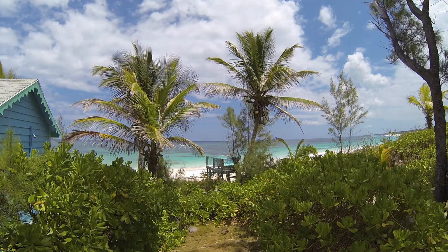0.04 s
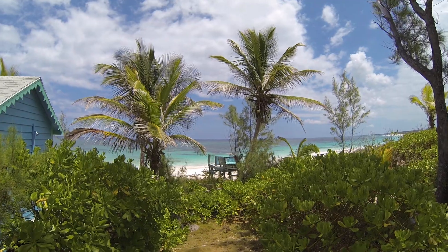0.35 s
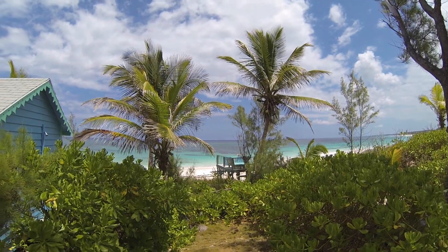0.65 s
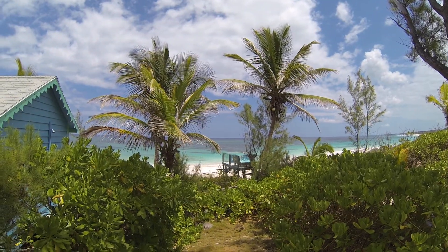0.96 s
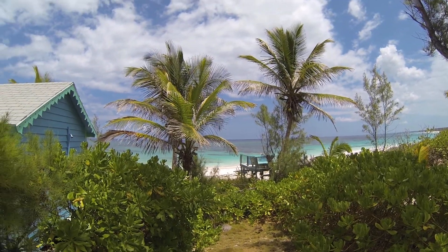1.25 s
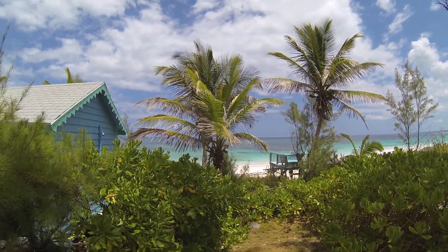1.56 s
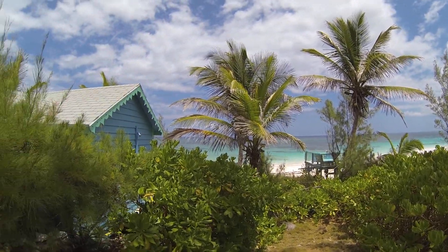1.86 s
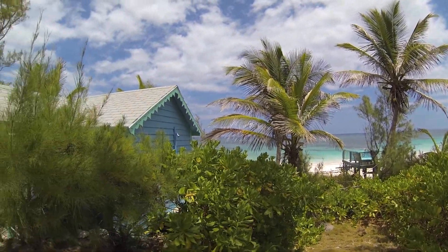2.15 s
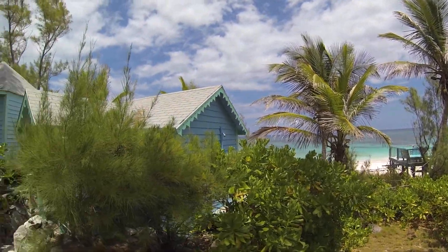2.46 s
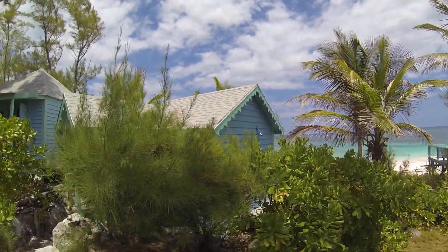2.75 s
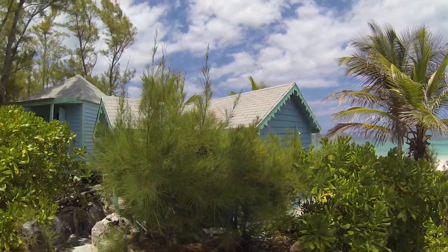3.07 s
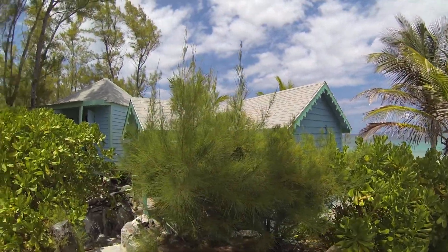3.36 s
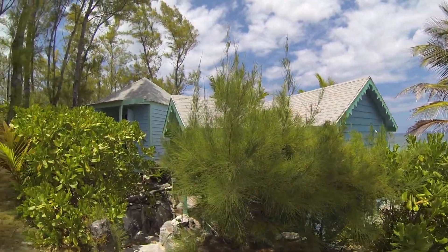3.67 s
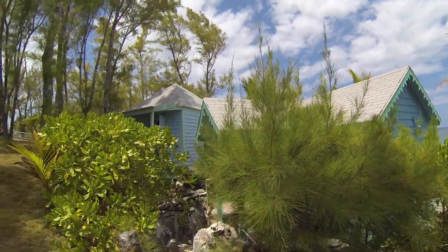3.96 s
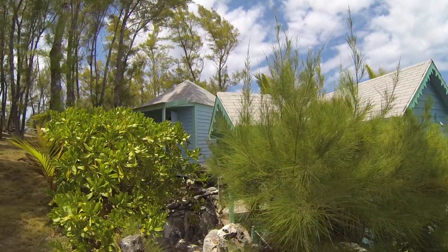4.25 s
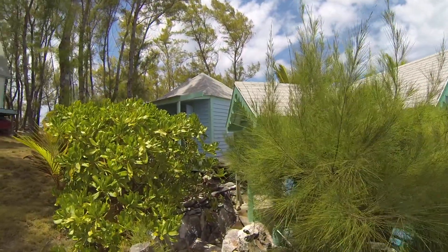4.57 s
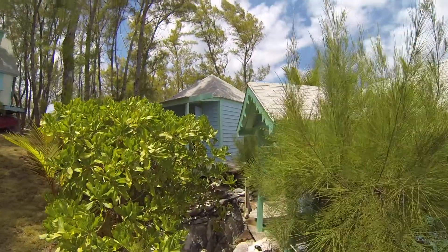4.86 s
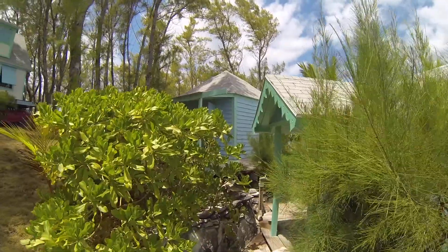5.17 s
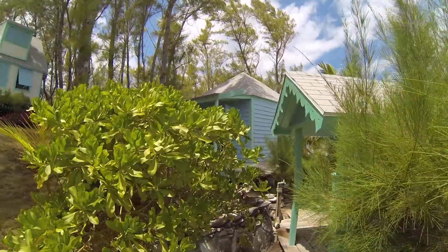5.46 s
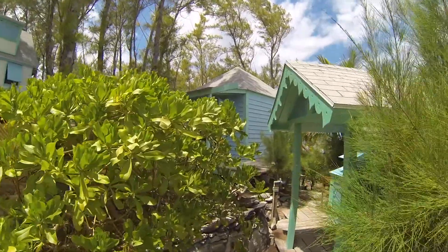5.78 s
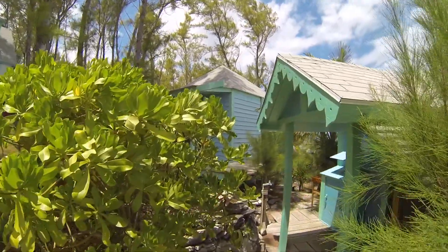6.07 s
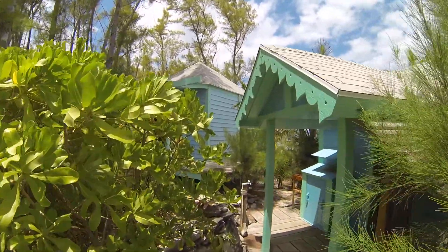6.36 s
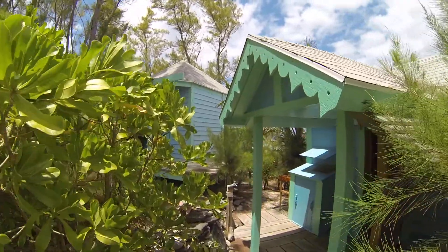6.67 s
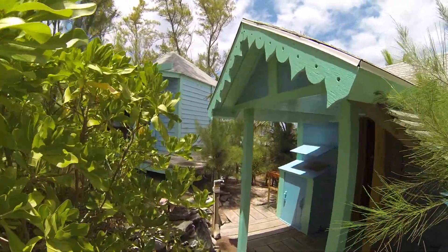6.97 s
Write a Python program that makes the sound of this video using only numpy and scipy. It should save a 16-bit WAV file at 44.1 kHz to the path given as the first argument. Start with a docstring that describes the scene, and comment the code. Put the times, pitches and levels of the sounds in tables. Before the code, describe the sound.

Close, high cicada buzzing outdoors with a soft wash of far waves and leaves, interrupted by low wind buffeting the microphone.

```python
"""A garden behind a beach; one microphone, turning from the sea towards the trees.
From the start a cicada buzzes close by, snapping the ribs of its tymbal, with a far chorus behind it.
Distant surf slowly gives way to wind in the foliage, while a breeze rumbles on the microphone.
Midway, gusts buffet the diaphragm and the limiter ducks. Then the breeze drops, leaves brush,
a twig ticks, and the low murmur of the reef swells near the end."""
import sys
import numpy as np
from scipy import signal
from scipy.fft import rfft, irfft
from scipy.io import wavfile
from scipy.ndimage import uniform_filter1d, map_coordinates

SR = 44100
rng = np.random.default_rng(int(sys.argv[2]) if len(sys.argv) > 2 else 0)


def master_out(mix):
    """Clip the mix to full scale and print it as 16-bit PCM to the path in sys.argv[1]."""
    frames = np.transpose(np.atleast_2d(mix))
    ceiling = np.clip(frames, -1, 1)
    pcm = np.round(ceiling * 32767).astype(np.int16)
    wavfile.write(sys.argv[1], SR, pcm)


N = 313992
T = np.arange(N) / SR
HZ = np.fft.rfftfreq(N, 1 / SR)


def cicadas():
    """Close by, tymbal clicks ring one insect's body; far off, a chorus blurs into hiss."""
    # resonances of the body and of its overtone: (frequency [Hz], gain [dB])
    body_spectrum = [(2470, -47), (4200, -17), (4480, -3.5), (4790, -1.5), (5250, -3), (5520, -4),
                     (5850, -6), (6650, -2.7), (7250, -1), (8300, -6.5), (8900, -11.5), (9400, -20.5),
                     (12200, -46), (20700, -120)]
    overtone_spectrum = [(10500, -26), (11600, -3), (12300, 11), (13200, 8), (14300, 1), (15500, -27)]
    # the buzz ahead of its swells: (time [s], level [dB])
    buzz_levels = [(0.1, -47.5), (1.15, -48), (1.8, -47.5), (2.6, -45.5), (3.2, -46), (3.62, -44),
                   (3.98, -41.5), (4.3, -41.5), (4.7, -41.3), (5.1, -42), (5.85, -42.3), (6.5, -40.5),
                   (7.1, -42.4)]
    # the overtone flares up: (middle [s], half length [s], boost [dB])
    flares = [(.7, .2, 3.5), (1.75, 0.4, 7), (3.45, .1, 2.5), (4.1, .15, 4), (4.8, 0.4, 3.5),
              (5.531, 0.2, 5.5), (6.05, 0.15, 3)]
    body_clicks, overtone_clicks = tymbal(speed=0.99, waver=0.00421, jitter_ms=0.03)
    near = evened(scattered(body_clicks, t60=.07, wet_db=0))
    chorus = gain_of(-5) * noise()
    song = steadied(coloured(reflected(near + chorus), body_spectrum), 0.08)
    buzz_db = curves(buzz_levels)[0]
    buzz = gain_of(buzz_db) * swelling(song)
    # each snap leaves a brief fizz, so the strong ribs merge into one pulse a cycle
    snap_energy = signal.lfilter([1], [1, -np.exp(-1 / (.001 * SR))], overtone_clicks ** 2)
    fizz = evened(noise() * np.sqrt(abs(snap_energy)))
    snaps = evened(scattered(overtone_clicks, t60=0.027, wet_db=4))
    overtone = steadied(coloured(fizz + .5 * snaps, overtone_spectrum), .2)
    # the overtone lies under the buzz and follows its loudness
    usual_db, under_db, follow = -44.5, -15, 0.99
    flare_db = sum(db * np.exp(-((T - s) / half) ** 2) for s, half, db in flares)
    overtone_db = usual_db + under_db + follow * (buzz_db - usual_db) + flare_db
    return buzz + gain_of(overtone_db) * overtone


def tymbal(speed, waver, jitter_ms):
    """Ribs buckle one after another in each cycle: clicks for the body and for the overtone."""
    # the tymbal's pace, to be scaled by speed: (time [s], base rate [cycles/s])
    pace = [(0, 96), (1.2, 108), (2.2, 101), (3, 92.2), (4, 92.4), (5, 99.6), (7.1, 98)]
    # the ribs: (place in the cycle [0-1], body drive [dB], overtone drive [dB])
    ribs = [(0.112, -5.5, -9.5), (0.231, 1.5, 5), (0.399, -12, -13.5), (.50, 4.5, -1), (0.658, -30, 6),
            (.78, 4, 11), (0.967, -1, -22)]
    cycles = np.cumsum(speed * curves(pace)[0] * (1 + waver * drift(38.4))) / SR
    place, body_db, overtone_db = np.transpose(ribs)
    due = np.arange(int(cycles[-1]) + 1)[:, None] + place
    slip, force = rng.standard_normal((2,) + due.shape)
    seconds = (np.interp(due, cycles, T) + jitter_ms * slip / 1000).ravel()
    strength = gain_of(0.26 * force) * (due < cycles[-1])
    return [clicks(seconds, (strength * gain_of(db)).ravel()) for db in (body_db, overtone_db)]


def swelling(song):
    """Swaying branches make the buzz flutter in patches; bands of it swell, glide and sink back."""
    # (middle [s], half length [s], first pitch [Hz], last pitch [Hz], half width [Hz], boost [dB])
    swells = [(.6, 1.5, 7060, 7050, 750, 5), (.95, 1.8, 6930, 7120, 85, 4.5),
              (1.56, .43, 6850, 6750, 1020, 8.5), (2.02, 0.33, 6400, 6360, 1180, 9.5),
              (2.33, 0.66, 8460, 8000, 610, 6.5), (2.56, 0.42, 5770, 6200, 574.1, 10.5),
              (2.929, 0.39, 5360, 4860, 332, 10), (3.374, 0.32, 5640, 5600, 453.6, 9),
              (3.85, 0.33, 4960, 4920, 92.59, 10.5), (3.944, 0.27, 7400, 7600, 2052, 5),
              (4.35, 1.3, 7080, 7100, 148.1, 2), (5.448, 0.38, 6991, 8478, 1026, 5.5),
              (5.68, 0.46, 6270, 5750, 190, 5.5), (5.82, .27, 4900, 5000, 120.4, 0),
              (6.414, 0.33, 4600, 4620, 170, 2.5), (7.0, .35, 4798, 5200, 130, 6),
              (7.103, 0.18, 5800, 6750, 432, 7.5)]
    flutter_db, flutter_s, flutter_hz = 1.1, .15, 170
    hz, t, spectra = signal.stft(song, SR, nperseg=2048, noverlap=1536)
    patches = uniform_filter1d(rng.standard_normal(spectra.shape), int(flutter_hz / hz[1]), axis=0)
    db = flutter_db * evened(uniform_filter1d(patches, int(flutter_s / t[1]), axis=1))
    for middle, half, first_hz, last_hz, width_hz, boost_db in swells:
        progress = np.clip(.5 + .5 * (t - middle) / half, 0, 1)
        off_centre = (hz[:, None] - first_hz - (last_hz - first_hz) * progress) / width_hz
        db += boost_db * np.sin(np.pi * progress) * np.exp(-off_centre ** 2)
    return signal.istft(spectra * gain_of(db), SR, nperseg=2048, noverlap=1536)[1][:N]


def scattered(x, t60, wet_db):
    """Adds dense echoes off leaves and walls, which change as the microphone moves."""
    t = T[:SR // 4]
    tails = rng.standard_normal((2, len(t))) * 1e-3 ** (t / t60)
    first, second = (signal.fftconvolve(x, tail / np.linalg.norm(tail))[:N] for tail in tails)
    return x + gain_of(wet_db) * (np.cos(2 * T) * first + np.sin(2 * T) * second)


def reflected(x):
    """A close reflection, about 2 ms late, combs the buzz."""
    # (time [s], comb spacing [Hz], echo strength [0-1])
    reflection = [(0, 532, 0.2), (1.5, 569, 0), (2.4, 545.8, 0.3), (3.2, 550, 0.47), (3.8, 570, 0),
                  (4.6, 534, 0), (5.4, 545, 0.26), (6.4, 582, 0.17), (7.1, 554, 0)]
    comb_hz, strength = curves(reflection)
    return x + strength * map_coordinates(x, [np.arange(N) - SR / comb_hz], order=3)


def microphone_wind():
    """Air right on the microphone: a slow rumble, and in gusts small eddies striking the port."""
    # rumble of the light breeze: (time [s], level [dB])
    breeze = [(0, -33.5), (.9, -38), (2.5, -32.5), (3, -23.5), (4.3, -30.5), (5.15, -32), (5.4, -45.5),
              (7.1, -56)]
    # (start [s], length [s], rumble [dB], turbulence [dB])
    gusts = [(.19, 0.18, -30, -59), (1.097, .14, -32, -61), (1.38, .3, -24.5, -49.5),
             (2.217, .13, -23, -70), (2.605, 0.088, -19.5, -32.5), (2.712, 0.091, -17, -26.5),
             (2.839, 0.12, -17, -20), (2.98, 0.15, -22.5, -19.5), (3.106, 0.073, -12.5, -39),
             (3.339, 0.045, -20.5, -18), (3.401, 0.118, -20.5, -21), (3.513, 0.16, -16.5, -25.5),
             (3.731, 0.061, -18.5, -15), (3.811, 0.045, -12, -11.5), (3.896, .15, -23, -20.5),
             (4.071, 0.096, -21.5, -21.5), (4.214, 0.041, -16.5, -19), (4.3, 0.024, -24, -31.5),
             (4.597, 0.032, -25.5, -40), (4.734, 0.088, -23, -33.5), (5.107, 0.089, -25.5, -58)]
    # colours of the rumble and of the eddies: (frequency [Hz], gain [dB])
    rumble_spectrum = [(10, -25), (22, 8), (35, 0), (65, -4), (105, -18), (160, -31), (300, -45.5),
                       (600, -69)]
    eddy_spectrum = [(30, -15), (85, 9.5), (150, 1.5), (240, -3.5), (330, -10), (460, -18.5), (700, -34),
                     (1100, -53), (2500, -55), (6000, -81)]
    lulls_db = 2 * drift(7)
    flow, turbulence = gain_of(curves(breeze)[0] + lulls_db), np.zeros(N)
    for start, length, rumble_db, eddy_db in gusts:
        flow = np.maximum(flow, gain_of(rumble_db) * gust(start, length, release_s=0.029))
        turbulence = np.maximum(turbulence, gain_of(eddy_db) * gust(start, length, release_s=0.014))
    rumble = flow * steadied(coloured(noise(), rumble_spectrum), 0.11)
    eddies_per_s = 450
    strikes = noise() * (rng.random(N) < eddies_per_s / SR)
    lumps_db = 2.5 * (drift(22) + 0.06)
    eddies = steadied(coloured(strikes, eddy_spectrum), 0.036) * gain_of(lumps_db)
    fine = band(eddies, 368, 6000, order=4)
    growth = turbulence / gain_of(-22)  # harder gusts shed finer eddies
    return rumble + turbulence * (eddies - fine + growth * fine)


def gust(start, length, release_s, attack_s=0.021):
    """A gust's envelope: it rises quickly, holds and dies away."""
    rise = np.clip((T - start) / attack_s + .5, 0, 1)
    return rise * np.exp(-np.maximum(T - start - length, 0) / release_s)


def buffets():
    """A large eddy sucks at the diaphragm, which swings back; the rush of air rasps in the port."""
    # (time [s], peak [dB], half width [ms], rasp [dB])
    blows = [(0.215, -19, 4.9, -70), (2.703, -7, 4.9, -60), (2.769, 0.5, 1.9, -42), (2.844, -4.5, 3.5, -50),
             (2.902, -7, 1.34, -46), (2.941, 3.5, 2.6, -43), (3.365, -1.5, 1.86, -60), (3.575, 1, 4.7, -41),
             (3.634, -6.5, 4.5, -49), (3.776, -10, 1.1, -60), (3.836, 0.5, 1.5, -60),
             (4.092, -4, 2.14, -60), (4.164, 0, 3.2, -40), (4.621, -10, 4.6, -70), (4.834, -16, 2.5, -70)]
    out = np.zeros(N)
    rasp = evened(band(noise(), 560, 4730, order=3))
    for s, db, width_ms, rasp_db in blows:
        span = abs(T - s) < .06
        widths = (T[span] - s) * 1000 / width_ms
        bell = 1 / (1 + widths ** 2)
        suction = (1 - widths ** 2 / 2) * bell ** 2.5
        out[span] += gain_of(rasp_db) * bell * rasp[span] - gain_of(db) * suction
    return out


def surf_and_trees():
    """As the microphone turns, distant surf gives way to wind in leaves and needles."""
    # surf and foliage together: (time [s], relative roar [dB], relative rustle [dB])
    air_levels = [(0.2, -44, -48.5), (0.6, -44.5, -44), (1.2, -46.5, -49.5), (1.75, -50.5, -54.5),
                  (2.6, -48, -53.5), (3.0, -51, -56.5), (3.3, -45.5, -52), (3.65, -46, -52),
                  (4.4, -42.5, -46), (5.0, -45, -54), (5.55, -46, -53), (5.8, -46, -50.5),
                  (7.1, -45, -51.5)]
    # (time [s], the sea's share of the power [0-1])
    seaward = [(0, 0.95), (1.3, 0.76), (3, 0.77), (4.2, 0.17), (7.1, 0.49)]
    # colours of surf, leaves and needles: (frequency [Hz], gain [dB])
    surf_spectrum = [(110, -11), (180, -8), (354, 0.5), (500, -6), (755, 0), (909, -3.5), (1200, -7.5),
                     (1350, -9), (1630, -2), (2020, -7.5), (2370, -12), (2700, -19), (3340, -14.5),
                     (3720, -25), (4300, -18.5), (5590, -41), (9460, -120)]
    leaf_spectrum = [(71, -29), (120, 2), (148, -1.5), (188, -9.5), (353, -10.5), (561, -9.5), (682, -11),
                     (1260, -14.5), (3870, -25), (4300, -22.5), (5590, -52), (9460, -120)]
    needle_spectrum = [(3000, -12), (4300, -2), (7000, 6.5), (9600, -2), (11000, 5.5), (13000, 0),
                       (15300, 2.5)]
    # hiss of the needles: (time [s], level [dB])
    needle_levels = [(0, -57.5), (1.6, -56.5), (2.5, -53.5), (3.3, -58), (4.5, -52.5), (5, -54.5),
                     (7.1, -54.5)]
    roar_db, rustle_db = curves(air_levels)
    sea_share = curves(seaward)[0]
    surf, trees = coloured(noise(), surf_spectrum), coloured(noise(), leaf_spectrum)
    surf, trees = (x / band(x, 1000, 2200).std() for x in (surf, trees))  # equal in the midrange
    wash = np.sqrt(sea_share) * surf + np.sqrt(1 - sea_share) * trees
    roar = gain_of(roar_db - 4 + .5 * drift(3.9)) * band(wash, 112, 2204)
    rustle = gain_of(rustle_db - 3.5 + 0.51 * drift(30)) * steadied(band(wash, 2224, 4230), 0.21)
    needle_db = curves(needle_levels)[0] + 0.33 * drift(20)
    needles = gain_of(needle_db) * evened(coloured(noise(), needle_spectrum))
    return roar + rustle + needles


def reef():
    """Breakers far out on the reef merge into one low murmur."""
    # (frequency [Hz], gain [dB])
    murmur_spectrum = [(25, 4.5), (50, 0.5), (90, 2), (130, -5.5), (180, -12.5), (300, -16), (600, -59)]
    # (time [s], level [dB])
    murmur_levels = [(0, -45), (4, -43), (5.5, -42.5), (6.2, -38), (7.1, -41)]
    return gain_of(curves(murmur_levels)[0]) * evened(coloured(noise(), murmur_spectrum))


def twig():
    """A twig ticks: a dry crack with a very short ring."""
    # (time [s], level [dB], ring [Hz])
    ticks = [(5.914, -29, 9700)]
    out = np.zeros(N)
    for s, db, hz in ticks:
        span = (T > s) & (T < s + .02)
        age = T[span] - s
        ring = np.sin(2 * np.pi * hz * age) * np.exp(-age / 0.00042)
        crack = .5 * rng.standard_normal(len(age)) * np.exp(-age / 0.00045)
        out[span] += gain_of(db) * (ring + crack)
    return out


def leaf_brush():
    """Leaves slide past each other in a short, soft swish."""
    # (time [s], level [dB], half length [s])
    swishes = [(5.226, -48, 0.016)]
    swell = sum(gain_of(db) * np.exp(-((T - s) / half) ** 2) for s, db, half in swishes)
    return swell * evened(band(noise(), 1000, 3800, order=6))


def whine():
    """The camera that carries the microphone gives off a faint, steady tone."""
    # (frequency [Hz], rms level [dB])
    tones = [(10648, -75)]
    return sum(gain_of(db) * np.sqrt(2) * np.sin(2 * np.pi * hz * T) for hz, db in tones)


def gain_of(db):
    """Decibels to an amplitude factor."""
    return 10 ** (np.asarray(db) / 20)


def evened(x):
    """Scales to rms 1."""
    return x / np.sqrt(np.mean(x ** 2) + 1e-20)


def steadied(x, seconds):
    """Holds the rms near 1 over stretches of the given length."""
    size = int(seconds * SR)
    power = uniform_filter1d(uniform_filter1d(x ** 2, size), size)
    return x / np.sqrt(abs(power) + 1e-12)


def curves(rows):
    """Each value column of (time [s], ...) rows, at every sample."""
    s, *columns = np.transpose(rows)
    return [np.interp(T, s, column) for column in columns]


def coloured(x, points):
    """Filters by a spectrum of (frequency [Hz], gain [dB]) points."""
    hz, db = np.transpose(points)
    return irfft(rfft(x) * gain_of(np.interp(np.log(HZ + 1), np.log(hz + 1), db)), N)


def band(x, lo_hz, hi_hz, order=40):
    """A band-pass with soft edges."""
    return irfft(rfft(x) * (1 / (1 + (HZ / hi_hz) ** order) - 1 / (1 + (HZ / lo_hz) ** order)), N)


def noise():
    """White noise."""
    return rng.standard_normal(N)


def drift(rate_hz):
    """A random wander of rms 1, mostly slower than rate_hz."""
    return evened(np.interp(T * 2 * rate_hz, np.arange(4096), rng.standard_normal(4096)))


def clicks(seconds, sizes):
    """Band-limited clicks at exact times."""
    at = seconds[:, None] * SR
    taps = np.floor(at).astype(int) + np.arange(-7, 9)
    shape = np.sinc(taps - at) * np.sinc((taps - at) / 8)
    return np.bincount(np.clip(taps, 0, N).ravel(), (shape * sizes[:, None]).ravel(), N + 1)[:N]


def scene():
    """The garden and the wind at one microphone."""
    garden = cicadas() + surf_and_trees() + reef() + twig() + leaf_brush()
    return (garden + microphone_wind() + buffets() + whine())[None]


def record(dry):
    """A limiter ducks at the hardest buffets; the sound opens after a brief silence, top treble cut."""
    threshold_db, release_db_per_s, start_s, edge_hz = -6.5, 75, .107, 15350
    over_db = .8 * np.maximum(20 * np.log10(abs(dry[0]) + 1e-9) - threshold_db, 0)  # ratio 5:1
    recovery_db = release_db_per_s * T
    held_db = np.maximum.accumulate(over_db + recovery_db) - recovery_db
    ducked = dry / gain_of(signal.lfilter(np.ones(64) / 64, 1, held_db))  # 1.5 ms attack
    switched_on = np.clip((T - start_s) / .006, 0, 1)
    low_pass = signal.firwin(601, edge_hz, window=("kaiser", 9), fs=SR)
    return signal.oaconvolve(ducked * switched_on, low_pass[None], "same")


dry = scene()
out = record(dry)
master_out(out)
```